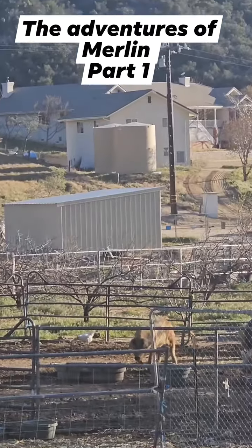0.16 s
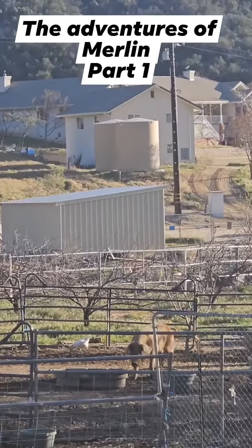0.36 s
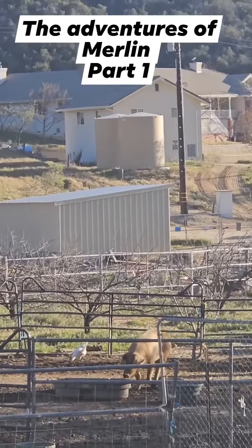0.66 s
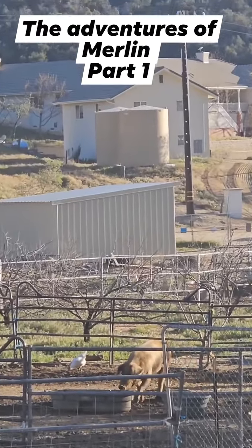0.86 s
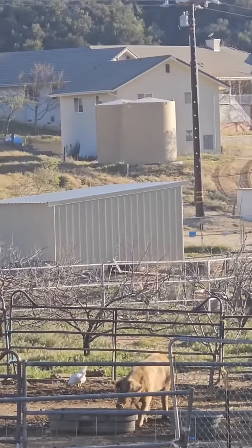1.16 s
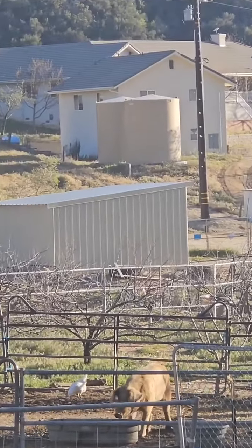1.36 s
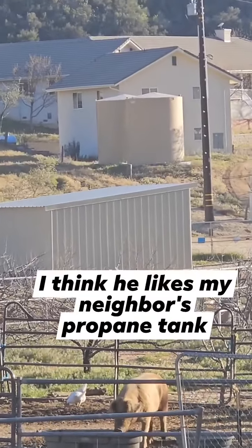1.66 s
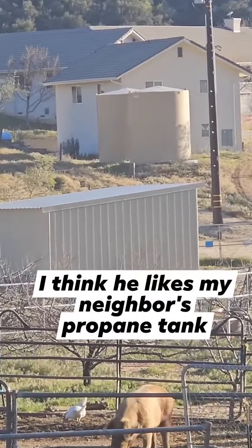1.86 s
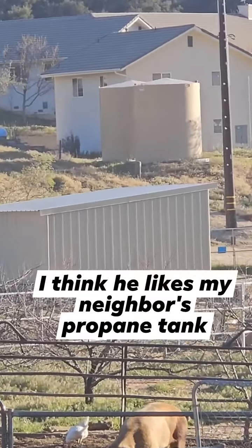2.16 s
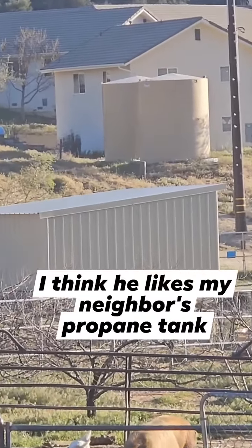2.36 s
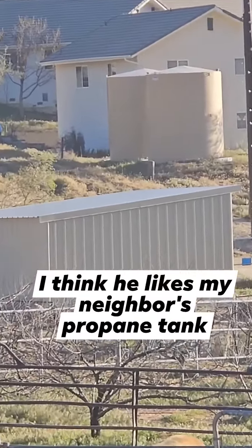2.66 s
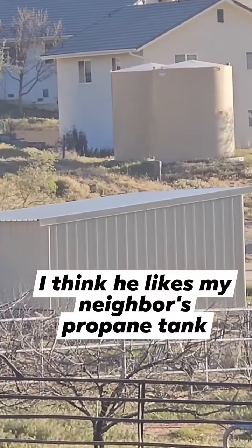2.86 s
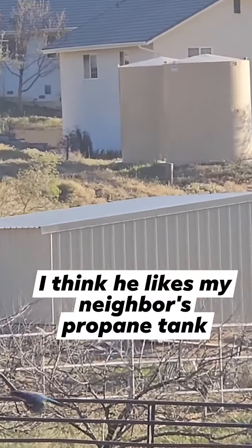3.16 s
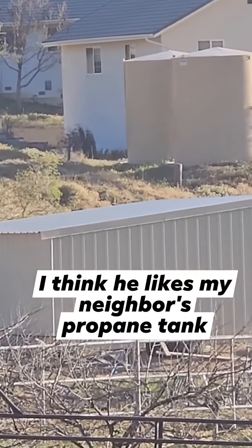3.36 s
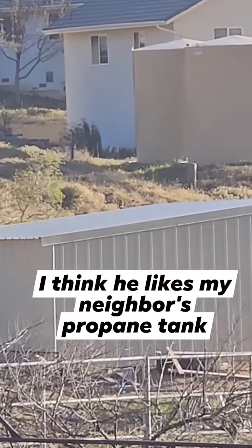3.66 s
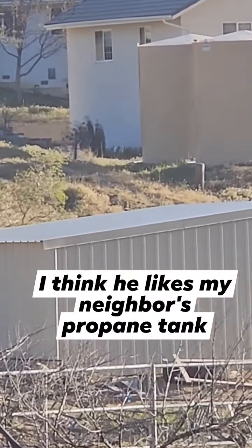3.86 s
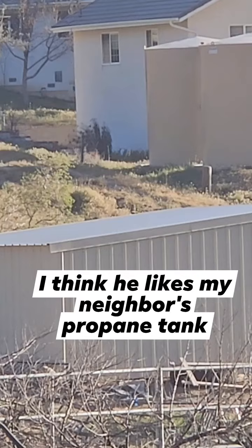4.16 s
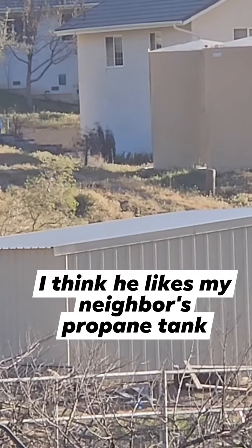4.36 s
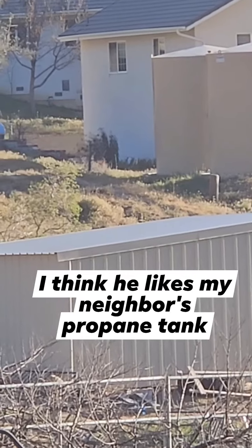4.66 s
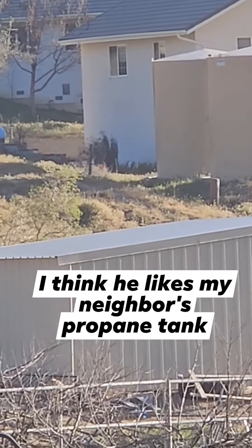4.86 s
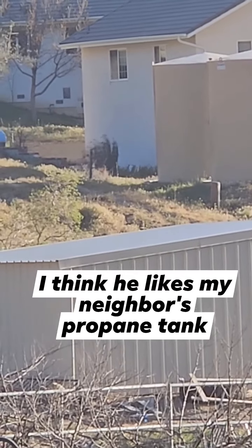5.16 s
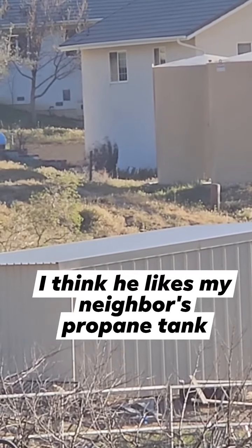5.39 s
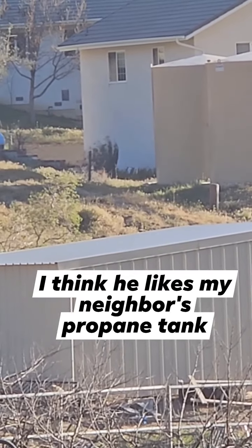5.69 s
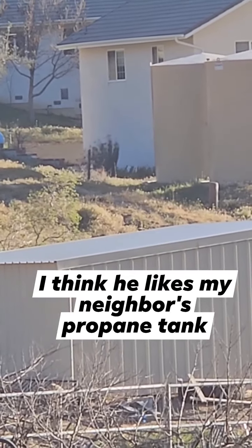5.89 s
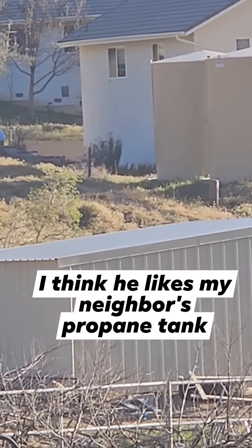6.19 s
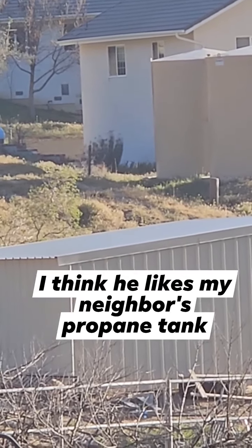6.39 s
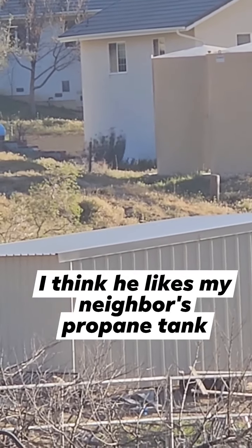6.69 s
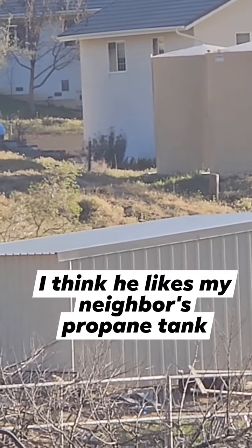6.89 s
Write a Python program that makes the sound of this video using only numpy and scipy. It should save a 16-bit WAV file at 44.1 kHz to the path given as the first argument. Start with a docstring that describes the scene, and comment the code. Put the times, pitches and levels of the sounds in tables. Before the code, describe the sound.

A quiet open farmyard, with low distant rumble and soft air hiss throughout. In the first 0.8 seconds there are faint soft thumps and dragging soles. At about 0.9 a close peafowl, a little right of centre, makes a few creaky, slack beats that quicken into a cracked, rough onset. From 1.0 to 2.05 it wails once, very loud, nasal and bright: pitch climbs from around 550 to 750 hertz, jumps into a long arch from 1.3 to 1.75, then slides steeply down to a honk near 260. Nearby sheds return a brief diffuse echo. From 2.1 to 6.4 feet shuffle irregularly in dry litter, with quiet hollow knocks, gritty scuffs and little snaps, firmer around 4.05 and 5.3. A faint short bird call comes at 3.4, and a tiny high chirp at 6.7 as the movement thins out.

```python
"""Far rumble and air hiss run throughout, as shaped noise; soft thumps and dragging soles are heard first.
A peafowl close by, a little to the right, then wails once: slack beats quicken into a cracked half-pitch onset,
a long arch and a falling honk, made of overtones weighted by windpipe and beak. Feet shuffle on with hollow
knocks (damped tones), ticks and scuffs (noise). Two faint birds, gliding tones, call once each, near the middle
and the end. Nearby sheds answer the wail and the knocks briefly, with decaying noise as their echo."""
import sys
import numpy as np
from scipy import signal
from scipy.fft import rfft, irfft, next_fast_len
from scipy.io import wavfile
from scipy.ndimage import uniform_filter1d, map_coordinates

SR = 44100
rng = np.random.default_rng(int(sys.argv[2]) if len(sys.argv) > 2 else 0)


def digitize_waveform(pressure):
    """Quantize a signal to 16-bit integers and store it at the path in sys.argv[1].

    Rows of a 2-D input are taken as channels; values are limited to [-1, 1].
    """
    field = np.atleast_2d(pressure).T
    bounded = np.clip(field, -1, 1)
    quanta = np.round(bounded * 32767).astype(np.int16)
    wavfile.write(sys.argv[1], SR, quanta)


N = 310315


def amp(db):
    """Level to amplitude: 20 dB is a factor of ten."""
    return 10 ** (np.asarray(db) / 20)


def unit(x):
    """Normalise the signal to an rms of 1."""
    return x / np.sqrt(np.mean(x ** 2) + 1e-20)


def along(points, hz):
    """Columns of (frequency [Hz], value, ..) points, interpolated over log frequency."""
    f, *cols = np.transpose(points)
    return np.squeeze([np.interp(np.log(hz + 1), np.log(f + 1), c) for c in cols])


def curves(rows):
    """Columns of (time [s], value, ..) rows, interpolated linearly to one value per sample."""
    s, *cols = np.transpose(rows)
    return [np.interp(np.arange(N) / SR, s, c) for c in cols]


def wobble(rate):
    """Smooth random fluctuation: a spline through random knots, rate knots a second."""
    knots = rng.standard_normal(int(N * rate / SR) + 4)
    return map_coordinates(knots, [np.arange(N) * rate / SR])


def filtered(x, response):
    """Linear filtering: the spectrum of x times a complex response of frequency."""
    m = next_fast_len(N + SR // 2)
    spectrum = rfft(x, m) * response(np.fft.rfftfreq(m, 1 / SR))
    return irfft(spectrum, m)[..., :N]


def rush(spectrum, patchy_db):
    """Partly coherent stereo noise of rms 1, with random gain in patches of time and frequency."""
    # (frequency [Hz], left-right correlation)
    likeness = [(30, 0.66), (60, 1), (180, 0.81), (530, 0.77), (1570, 0.56), (4680, 0.012), (13900, 0.19)]
    z = signal.stft(rng.standard_normal((2, N)), nperseg=512)[2]
    field = uniform_filter1d(rng.standard_normal(z.shape[1:]), 6, axis=0)
    field = uniform_filter1d(field, 8, axis=1)
    pair = signal.istft(z * amp(patchy_db * unit(field)), nperseg=512)[1][:, :N]

    def mid_side(hz):
        # cos(2 angle) is the correlation
        angle = np.arccos(np.clip(along(likeness, hz), -1, 1)) / 2
        return amp(along(spectrum, hz)) * [np.cos(angle), np.sin(angle)]

    mid, side = filtered(pair, mid_side)
    return unit(np.array([mid + side, mid - side]))


def peafowl():
    """Source and filter: a harmonic voice, period-doubled at its onset, with breath and slack beats."""
    # rise, arch and fall of the wail; the voice jumps up into the arch:
    # (time [s], pitch [Hz], voice level [dB], extra weight of the fundamental [dB])
    wail = [
        [(.986, 546, -30, -2), (1.022, 570, -35.5, 2), (1.038, 560.4, -34.5, -7), (1.062, 582, -40, -4),
         (1.14, 649.6, -35.5, -2.5), (1.198, 676.3, -28.5, -2), (1.277, 710.5, -37, .3)],
        [(1.285, 747, -34, 7), (1.296, 747, -31.5, 3.5), (1.363, 736, -32, 4), (1.409, 744.6, -33, -1.5),
         (1.449, 735.3, -32, 0.5), (1.543, 756.5, -34, -4.5), (1.587, 759.8, -30.5, 2),
         (1.615, 753.4, -33, -4.5), (1.69, 742, -30.5, -3.5), (1.75, 722.5, -32, -1), (1.813, 677.2, -27, -6),
         (1.87, 626.2, -28.5, -5)],
        [(1.895, 578, -31, 9), (1.93, 490, -20, -1), (1.945, 434, -20, 5), (1.958, 386.8, -16.5, 0.5),
         (1.974, 354.4, -16.5, 1.5), (1.985, 326, -25.5, 0), (2.02, 271.5, -37, 4), (2.04, 257.3, -42, 9)],
    ]
    # every second beat is weaker as the voice sets in: (time [s], half-pitch lines against full ones [dB])
    crack = [(.97, 12), (1.0, -1), (1.035, 5), (1.047, -16), (1.06, -34), (1.1, -64)]
    # the beak opens and closes, moving its resonance: (time [s], octaves above the shut beak [oct])
    beak_opening = [(.99, 1.24), (1.02, 1.26), (1.033, 2.3), (1.06, 2.34), (1.13, 2.44), (1.19, 2.72),
                    (1.3, 3.07), (1.55, 3.053), (1.62, 2.915), (1.75, 2.595), (1.81, 2.36), (1.87, 2.27),
                    (1.9, 1.8), (1.935, 1.23), (1.97, 1.35)]
    # air leaking past: (time [s], level ahead of the colouring [dB])
    leak = [(.9, -78), (.95, -60), (1.0, -47), (1.05, -46.5), (1.25, -51.5), (1.32, -50.5), (1.6, -49),
            (1.75, -49.5), (1.88, -43), (1.95, -58.5), (2.1, -70)]
    slide_loss_db = 40  # per octave under the highest pitch

    rows = np.concatenate(wail)
    on = slice(round(rows[0, 0] * SR), round(rows[-1, 0] * SR))
    pitch_hz, level_db, weight_db = (c[on] for c in curves(rows))
    crack_db = curves(crack)[0][on]
    full_db = level_db - 10 * np.log10(1 + amp(crack_db) ** 2)  # the half-pitch lines take their share
    lines_db = overtones(pitch_hz, full_db, weight_db, curves(beak_opening)[0][on], count=10)
    slide_db = slide_loss_db * np.log2(pitch_hz / pitch_hz.max())
    lines_db[6:] += slide_db  # from the seventh line up
    turns = np.cumsum(pitch_hz * (1 + .0025 * wobble(50)[on])) / SR
    count = np.arange(len(turns))
    edge = np.minimum(1, np.minimum(count, count[::-1]) / (.011 * SR))  # 11 ms ramps

    voice, treble_lines, beat = np.zeros((3, N))
    treble_step = np.exp(2j * np.pi * 7575 * count / SR)
    for k, db in enumerate(lines_db, start=1):
        phase = 2 * np.pi * k * turns - .25 * k * k
        line = amp(db + 3 + .7 * wobble(45)[on]) * edge * np.exp(1j * phase)  # +3 dB: rms to peak
        voice[on] -= line.real
        # thin treble lines run parallel to the overtones, 7575 Hz higher, and fade further as pitch falls
        treble_lines[on] += amp(slide_db / 2) * (line * treble_step).real
    for k in range(5):
        # the crack level counts from the louder neighbouring overtone
        near_db = np.maximum(lines_db[k], lines_db[max(k - 1, 0)])
        phase = 2 * np.pi * (k + .5) * turns - .25 * (k + .5) ** 2
        voice[on] -= amp(near_db + crack_db + 3) * edge * np.cos(phase)

    treble_lines = treble_lines * (1 + 0.25 * wobble(350))  # frayed edges
    # (frequency [Hz], gain [dB])
    treble_gain = [(7700, -75), (8300, -29.5), (9000, -33), (9800, -34.5), (10500, -36),
                   (11300, -5.0), (12000, -50.0), (12800, -2), (13500, -37)]
    treble_lines = filtered(treble_lines, lambda hz: amp(along(treble_gain, hz)))

    # breath leaks past once a beat
    beat[on] = np.cos(2 * np.pi * turns)
    breath = amp(curves(leak)[0] + 2.4 * wobble(30.12)) * (1 + 0.36 * beat) * rng.standard_normal(N)
    breath = filtered(breath, lambda hz: throat(hz) ** 2 * amp(-7 * np.exp(-((hz - 6500) / 2600) ** 2)))
    call = voice + breath + creak()
    # the call is thin around 6 kHz
    call = filtered(call, lambda hz: amp(-22 * np.exp(-((hz - 6200) / 600) ** 2)))
    treble_pair = np.array([treble_lines, np.roll(treble_lines, 1)]) * amp([[-3.5], [3.5]])
    return filtered(np.array([call, call]), left_right) + treble_pair


def overtones(pitch_hz, level_db, weight_db, beak_oct, count):
    """Formant filtering: windpipe and beak resonances share out the voice power among the lines [dB]."""
    # fixed resonances, which the overtones sweep through: (frequency [Hz], gain [dB])
    windpipe = [(250, 29), (370, 43), (480, 17), (560, 7.5), (750, 0.1), (1000, -3.8), (1400, -2.8),
                (1750, -21), (2240, -14.5), (2700, -9.3), (3000, -35), (3350, -16), (3740, -11.5),
                (4450, -36), (5200, -19), (6000, -45), (7400, -30)]
    shut_hz, beak_db, width_oct = 350, 20.7, 0.45  # beak resonance when shut, its height and width
    hz = np.arange(1, count + 1)[:, None] * pitch_hz
    off_oct = np.log2(hz / shut_hz) - beak_oct
    db = along(windpipe, hz) + beak_db * np.exp(-(off_oct / width_oct) ** 2)
    db = db + (np.arange(count) == 0)[:, None] * weight_db
    return db + level_db - 10 * np.log10(np.sum(amp(db) ** 2, 0))


def creak():
    """Pulsed excitation: each slack beat swells for a few cycles, then a rasp rings the resonances."""
    t, hum, slaps = np.arange(N) / SR, np.zeros(N), np.zeros(N)
    for s, db, hz, swell_s in beats():
        u = t - s
        tone = np.cos(2 * np.pi * hz * u) + 0.33 * np.sin(2 * np.pi * 0.54 * hz * u)
        hum += amp(db - 2.0) * np.exp(-np.abs(u / swell_s) ** 1.25) * tone
        slaps += amp(db - 9.5) * (u > 0) * np.exp(-np.abs(u) / 0.0076) * rng.standard_normal(N)
    return hum + filtered(slaps, lambda hz: throat(hz) / (1 + 1j * hz / 2000) ** 3)


def beats():
    """Pulse train with geometrically shrinking gaps: rows (time [s], level [dB], pitch [Hz], swell [s])."""
    # two lone slack beats before the voice catches: (time [s], level ahead of the mix [dB], pitch [Hz])
    slack_beats = [(0.89, -41.5, 190), (.913, -28.5, 455)]
    lone_swell_s = 0.0073
    # then a run of six beats that quickens into the voice
    start_s, first_gap_s, quickening = .945, .0115, .86
    first_db, run_db, fade_db_per_beat = -23, -20.5, 0.3
    run_hz, run_swell_s, sharpening = 412, 0.0052, 0.75
    k = np.arange(6)
    s = start_s + first_gap_s * (1 - quickening ** k) / (1 - quickening)
    db = np.where(k, run_db - fade_db_per_beat * k, first_db)
    run = zip(s, db, run_hz + 0 * s, run_swell_s * sharpening ** k)
    return [(*row, lone_swell_s) for row in slack_beats] + list(run)


def throat(f):
    """Parallel damped resonances: a causal response summed with alternating sign."""
    # colour of the breath noise, with two narrow treble bands at the top:
    # (centre [Hz], width [Hz], peak gain per pass [dB])
    resonances = [(356, 820, 3.5), (1150, 920, 6), (2187, 240, 8), (3660, 440, 2), (6790, 1270, 3),
                  (11460, 540, 3.5), (12770, 420, 2)]
    total = 0
    for k, (centre, width, db) in enumerate(resonances):
        damping = 1j * f * width
        total = total + (-1) ** k * amp(db) * damping / (centre * centre - f * f + damping)
    return total


def left_right(hz):
    """Stereo cues: level and phase between left and right vary with frequency."""
    # (frequency [Hz], left minus right [dB], phase lead of the left [rad])
    balance = [(200, 0, 0), (400, -1.5, .1), (740, -4, .6), (1350, -4, .9), (2000, -3, -.2), (2250, -6, .4),
               (2700, -12, 1.2), (2960, -2, 2.3), (3350, -11, 2.1), (3740, -10, 1.9), (4450, 0, 3.1),
               (5200, -1, .6)]
    db, rad = along(balance, hz)
    half = amp(db / 2) * np.exp(1j * rad / 2)
    pair = np.array([half, 1 / half])
    return pair / np.maximum(np.abs(pair.mean(0)), .5)  # evens out the sum of both channels


def steps():
    """Impact excitation: feet set the hollow ground ringing in knocks and soft low thumps."""
    # (time [s], level [dB], pitch [Hz], 60 dB decay before limiting [s])
    hollow_knocks = [(1.797, -37, 422, 0.026), (2.13, -37, 369, 0.029), (2.607, -40.5, 403, 0.052),
                     (2.808, -44, 370, 0.048), (3.011, -45, 350, 0.023), (3.166, -42, 382, 0.062),
                     (3.264, -43, 433, 0.07), (3.474, -45, 422, 0.13), (3.813, -39.5, 373, 0.15),
                     (4.05, -29, 386, 0.04), (4.198, -39.5, 390, 0.0091), (4.395, -44.5, 333, 0.031),
                     (4.485, -36, 403, 0.025), (4.666, -43.5, 383, 0.02), (5.061, -35, 367, 0.14),
                     (5.282, -34.5, 374, 0.11), (5.409, -40.5, 380, 0.051), (5.632, -41, 378, 0.054),
                     (5.727, -46.5, 433, 0.036), (6.179, -40.5, 421, 0.067)]
    # same columns
    soft_thumps = [(0.262, -43, 123, 0.065), (0.332, -38.5, 157.6, 0.08), (3.642, -41.5, 171.5, 0.14),
                   (4.259, -42.5, 110.8, 0.11), (4.949, -37, 122, 0.031), (6.398, -42, 158, 0.44),
                   (6.467, -41, 199.3, 0.11)]
    return thuds(hollow_knocks, rise_s=0.01, lead_s=.005) + thuds(soft_thumps, rise_s=0.018, lead_s=.004)


def thuds(rows, rise_s, lead_s):
    """Damped oscillation: each step rings a few cycles, its phase wandering, under a dull puff of dust."""
    puff_db, puff_hz = -16, 882  # puff rms; smoothed over half a period of puff_hz
    out, t = np.zeros(N + SR), np.arange(SR // 4) / SR
    for s, db, hz, t60 in rows:
        drift = np.cumsum(rng.normal(0, 0.024, len(t)))
        shape = amp(-60 * t / np.clip(t60, .02, .3)) * (1 - np.exp(-(t / rise_s) ** 2))
        puff = uniform_filter1d(rng.standard_normal(len(t)), round(SR / puff_hz / 2))
        ring = np.sin(2 * np.pi * hz * t + drift) + amp(puff_db) * unit(puff)
        out[round((s - lead_s) * SR):][:len(t)] += amp(db) * shape / shape.max() * ring
    return out[:N]


def litter():
    """Fracture and friction noise: short snaps over the grainy scrape of soles, partly from one spot."""
    # dry stalks and grit snapping: (time [s], level ahead of the filters [dB], treble against it [dB])
    ticks = [(0.5627, -41, -19), (1.016, -29, -10), (2.0767, -40, -24), (2.1294, -51, -16),
             (2.555, -48, -5), (2.5805, -32.5, -19), (2.7177, -39.5, -40), (2.776, -37.5, -17),
             (2.8093, -30.5, -22), (2.953, -42, -16), (3.121, -36.5, -13), (3.1681, -38, -19),
             (3.229, -36, -12), (3.265, -34, -18), (3.3078, -42, -2), (4.0083, -34, -22),
             (4.039, -34.5, -19), (4.1265, -38, -25), (4.1776, -41, -14), (4.3555, -41, -15),
             (4.4049, -33, -21), (4.4872, -32, -10.5), (4.5251, -31, -24), (4.944, -40.5, -27),
             (4.9774, -44, -9), (5.058, -46.5, -7), (5.2397, -34, -19.5), (5.2771, -25, -26),
             (5.41, -50.5, 2), (5.5866, -45, -10), (5.632, -36, -18), (5.9246, -60, -37), (6.136, -46, -12),
             (6.6517, -41, -29), (6.871, -52.5, 3.5)]
    # spectrum of the scrape: (frequency [Hz], relative level per Hz [dB])
    scrape = [(180, -15), (300, -21), (376, -7), (573, -11), (621, -6.5), (930, -13.5), (2120, -17),
              (3130, -24.5), (4250, -21), (5970, -30), (10300, -35), (11600, -28.5), (14300, -39)]
    # (frequency [Hz], gain [dB])
    low_gain = [(120, -24), (400, 10.5), (900, -21.0), (2000, -8.0), (4500, -7.0), (6500, -18.5), (9000, -55)]
    high_gain = [(5000, -86), (7500, 9.5), (10000, -6.0), (12000, 5.0)]
    # grit cracking under a scuff: rate, decay, loudest crumb and the range below it
    crumbs_per_s, crumb_s, crumb_db, crumb_spread_db = 150, 0.0032, 0, 16.5

    snaps, t = np.zeros((2, N + SR)), np.arange(SR // 10) / SR
    decay = amp(-60 * t / .012) + .25 * amp(-60 * t / .06)  # a snap and its spray of crumbs
    for s, db, treble_db in ticks:
        burst = rng.standard_normal((2, len(t))) * amp(db + 3) * decay
        snaps[:, round(s * SR):][:, :len(t)] += burst * amp([[0], [treble_db]])
    low = filtered(snaps[0, :N], lambda hz: amp(along(low_gain, hz)))
    high = filtered(snaps[1, :N], lambda hz: amp(along(high_gain, hz)))

    drag = rush(scrape, patchy_db=3.5)
    drag = drag + 0.067 * drag.mean(0)  # a share common to both channels
    sparks = (rng.random(N) < crumbs_per_s / SR) * amp(crumb_db - crumb_spread_db * rng.random(N))
    crumbs = signal.lfilter([1], [1, -np.exp(-1 / (crumb_s * SR))], sparks)
    drag = drag + crumbs * filtered(drag, lambda hz: (hz > 900) & (hz < 6000))
    body = amp(1.44 * wobble(150) + 0.22 * wobble(30)) * filtered(drag, lambda hz: hz < 6000)
    fizz = amp(3.0 * wobble(200) + 3.8 * wobble(30)) * filtered(drag, lambda hz: hz > 6000)
    body_db, fizz_db = scuffs()
    return low + high + amp(body_db) * unit(body) + amp(fizz_db) * unit(fizz)


def scuffs():
    """Power addition of envelopes: scuffs swell, hold and fade over a faint stir; body and treble [dB]."""
    # soles dragging through dry litter:
    # (time at full strength [s], swell [s], hold [s], body level [dB], treble level [dB])
    drags = [(0.02, 0.09, 0.032, -56.5, -75), (0.556, 0.09, 0.047, -58.5, -71),
             (0.84, 0.052, 0.016, -65.5, -67), (2.015, 0.24, 0.12, -52.5, -65),
             (2.565, 0.13, 0.01, -50.5, -62.5), (2.813, 0.077, 0.007, -49, -61),
             (2.934, 0.27, 0.021, -53, -63.5), (3.185, 0.16, 0.04, -54, -69.5),
             (3.284, 0.054, 0.0067, -47, -62), (3.55, 0.026, 0.013, -55.5, -93),
             (3.73, 0.066, 0.023, -54.5, -63), (4.015, 0.012, 0.021, -46, -61),
             (4.11, .05, 0.026, -48.5, -63.5), (4.344, 0.013, 0.21, -51.5, -62),
             (4.748, 0.041, 0.011, -57.5, -82), (4.917, 0.039, .13, -50.5, -63.5),
             (5.22, 0.01, 0.18, -53.5, -67.5), (5.355, 0.17, 0.017, -48.5, -60.5),
             (5.586, 0.005, 0.005, -45.5, -60), (5.706, 0.27, 0.056, -48.5, -62),
             (5.915, 0.069, 0.12, -59, -66.5), (6.1, 0.042, 0.0067, -49, -60.5),
             (6.65, 0.34, 0.11, -66, -70), (6.939, 0.6, 0.052, -59, -63.5)]
    # the litter never lies quite still: (body level [dB], treble level [dB])
    stir_db = [-61.5, -100.5]
    still_until_s, still_db = 2.3, -11.5  # the stir is weaker early on
    swell_db, fade_db_per_s = 23, 178  # rise over the swell time, speed of the fade
    t = np.arange(0, N, 64) / SR
    power = amp(np.add.outer(stir_db, still_db * (t < still_until_s))) ** 2
    for s, swell, hold, *top_db in drags:
        rise_db = swell_db * np.maximum(s - t, 0) / max(swell, .005)
        fade_db = fade_db_per_s * np.maximum(t - s - hold, 0)
        power = power + amp(np.subtract.outer(top_db, rise_db + fade_db)) ** 2
    return curves(np.column_stack([t, *(10 * np.log10(power))]))


def faint_birds():
    """Superposition of two far calls."""
    # (time of the middle [s], level [dB], start pitch [Hz], end pitch [Hz], half-length [s])
    calls = [(3.43, -54, 720, 680, .05), (6.74, -62, 5250, 5100, .035)]
    return sum(chirp(*row) for row in calls)


def chirp(s, db, start_hz, end_hz, half_length_s):
    """Frequency modulation: one short gliding, unsteady tone in a bell-shaped envelope."""
    u = (np.arange(N) / SR - s) / half_length_s
    glide_hz = (start_hz + end_hz) / 2 + (end_hz - start_hz) / 2 * np.clip(u, -1, 1)
    pitch_hz = glide_hz * (1 + .012 * wobble(400))
    return amp(db + 4.1 * wobble(90)) * np.exp(-u ** 2) * np.sin(2 * np.pi * np.cumsum(pitch_hz) / SR)


def sheds(x):
    """Reverberation: each frequency of the walls' answer decays at its own speed."""
    # (frequency [Hz], 60 dB decay time [s])
    decay_times = [(300, 0.27), (1200, 0.59), (4000, 0.45), (12000, 0.77)]
    hz, t, z = signal.stft(rng.standard_normal((2, SR // 2)), SR, nperseg=256)
    apart = np.clip(hz / 1500, 0, 1)[:, None]  # both channels share the bass
    z = np.array([z[0] + apart * z[1], z[0] - apart * z[1]])
    tail = signal.istft(z * amp(-60 * t / along(decay_times, hz)[:, None]), SR, nperseg=256)[1]
    late = np.pad(x, (600, 0))[None]  # 600 samples of travel
    return signal.fftconvolve(late, tail / np.linalg.norm(tail[0]), axes=1)[:, :N]


def distance():
    """Broadband noise shaped in frequency: far rumble in lumps and a soft hiss of air."""
    # (time [s], rumble level [dB])
    rumble_level = [(0.0, -62.5), (0.37, -53.5), (0.66, -59.5), (1.0, -57), (1.47, -59.5), (3.76, -53),
                    (3.92, -55.5), (4.35, -49.5), (4.72, -58), (5.13, -54), (5.8, -49.5), (5.88, -50.5),
                    (6.05, -53), (6.56, -53.5), (6.76, -56.5), (7.04, -58.5)]
    # (frequency [Hz], relative level per Hz [dB])
    rumble_spectrum = [(12, -26), (20, -3.5), (107, 3.5), (145, -3.5), (189, -8.5), (300, -11), (390, -71),
                       (660, -120)]
    # same columns
    air_spectrum = [(120, -35), (200, -1.5), (401, -2), (544, -16), (930, -8), (1650, -15), (2110, -16.5),
                    (3020, -22.5), (4810, -26.5), (6070, -40.5), (7250, -26), (12000, -40.5), (14300, -65)]
    lumps = unit(amp(1.2 * wobble(12)) * rush(rumble_spectrum, patchy_db=1.2))
    hiss = amp(-58.5 + 0.4 * wobble(7.6)) * rush(air_spectrum, patchy_db=5.0)
    return amp(curves(rumble_level)[0]) * lumps + hiss


def scene():
    """Superposition of the wail, the feet, the faint birds, the sheds and the distance."""
    bird, dry_litter, knocks = peafowl(), litter(), steps()
    # the litter lies to the right: its sound reaches the left late
    late = np.array([np.roll(dry_litter[0], 20), dry_litter[1]])
    feet = knocks * amp([[-.3], [.3]]) + late * amp([[-.8], [.8]])
    # the thin shed walls return little of the bird's bass
    thin_bird = filtered(bird.mean(0), lambda hz: 1j * hz / (500 + 1j * hz))
    answer = amp(-10) * sheds(thin_bird) + amp(-4.5) * sheds(knocks)
    return bird + feet + faint_birds() + answer + distance()


def record(dry):
    """Band limitation: nothing passes above 14.3 kHz."""
    return filtered(dry, lambda hz: hz < 14300)


dry = scene()
out = record(dry)
digitize_waveform(out)
```